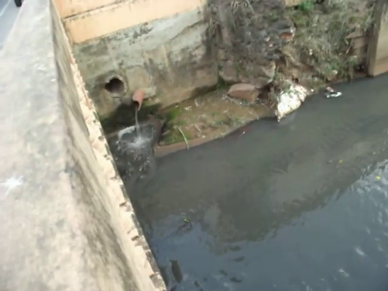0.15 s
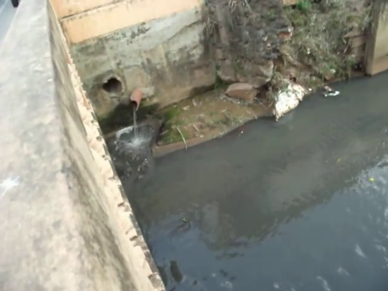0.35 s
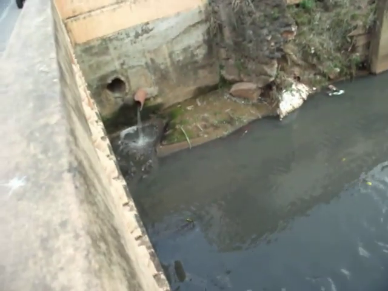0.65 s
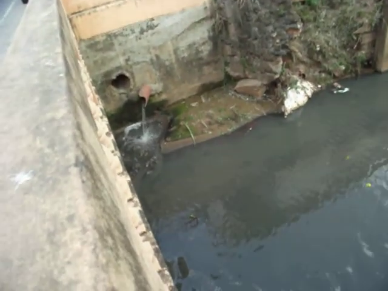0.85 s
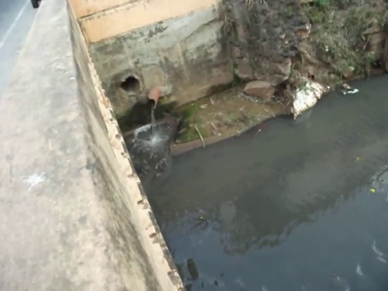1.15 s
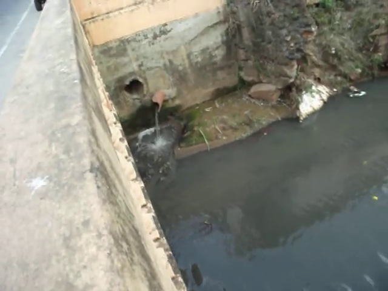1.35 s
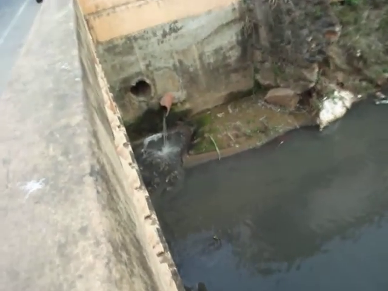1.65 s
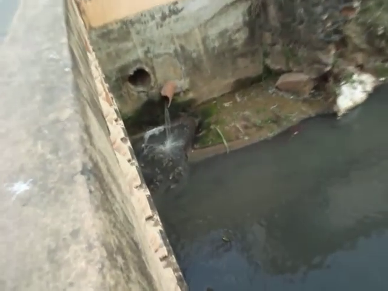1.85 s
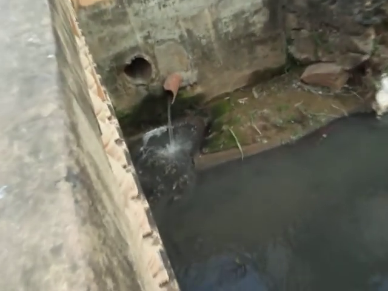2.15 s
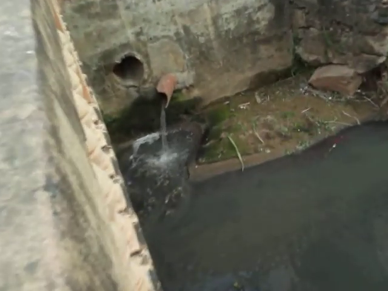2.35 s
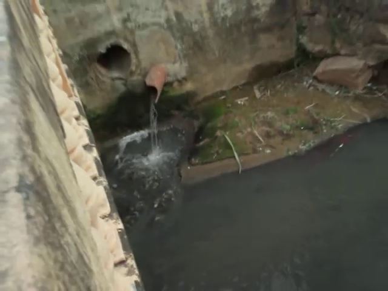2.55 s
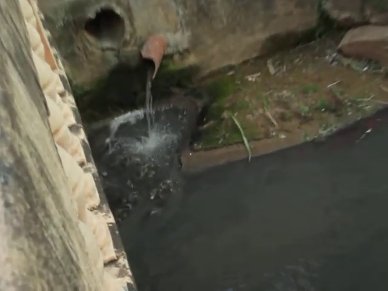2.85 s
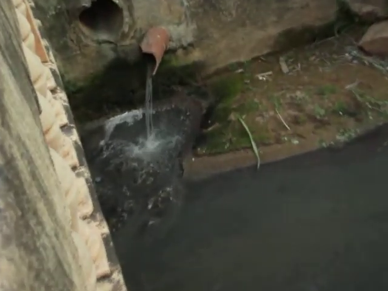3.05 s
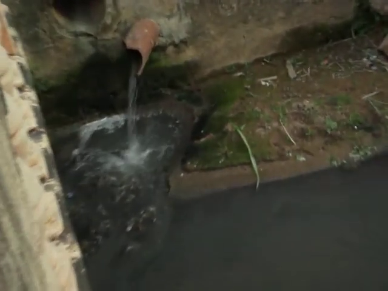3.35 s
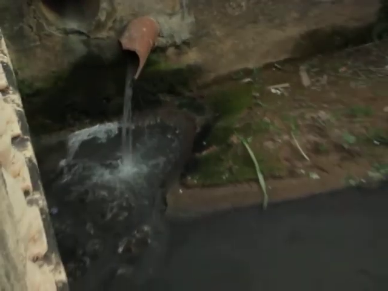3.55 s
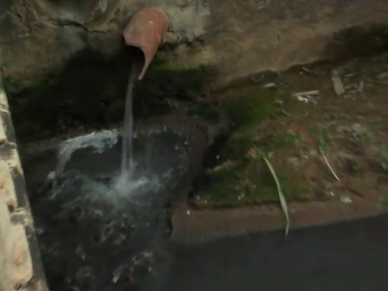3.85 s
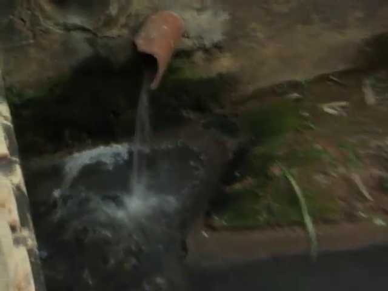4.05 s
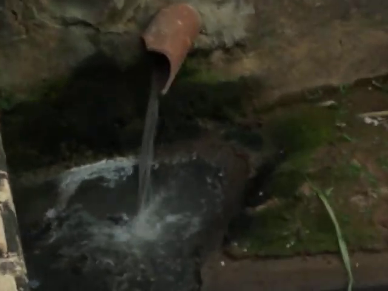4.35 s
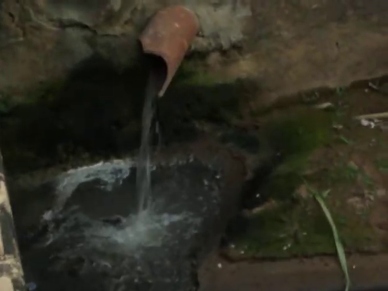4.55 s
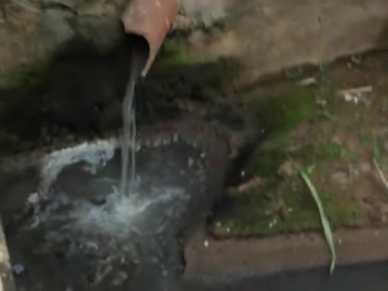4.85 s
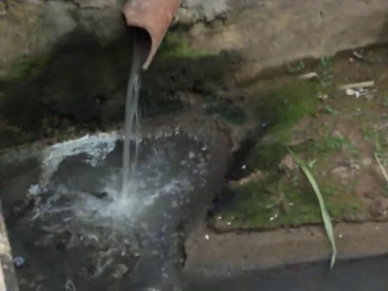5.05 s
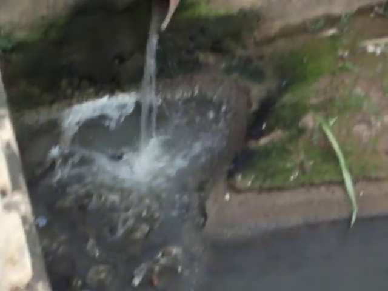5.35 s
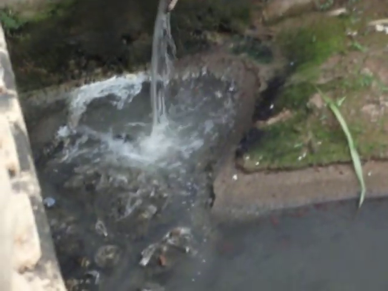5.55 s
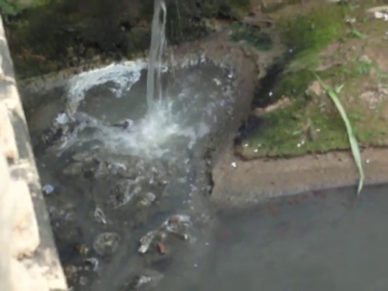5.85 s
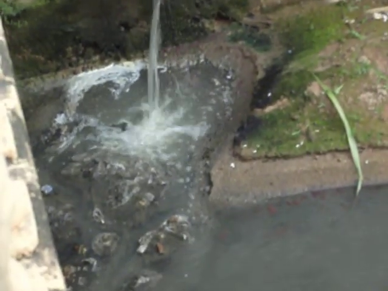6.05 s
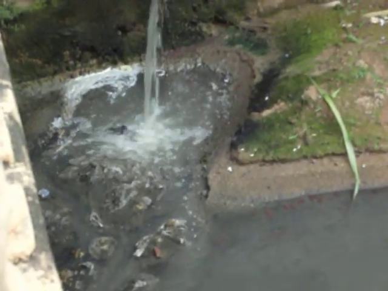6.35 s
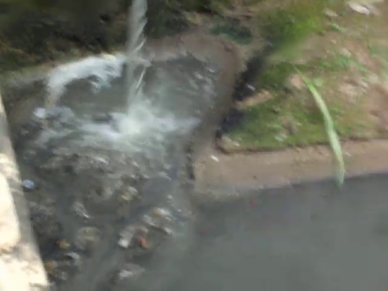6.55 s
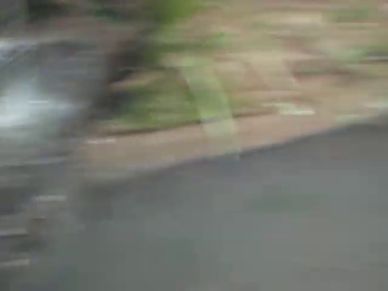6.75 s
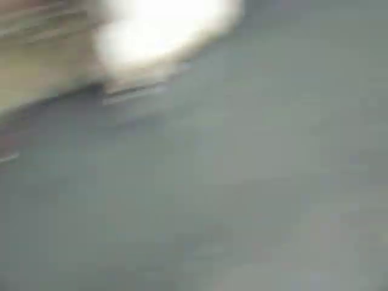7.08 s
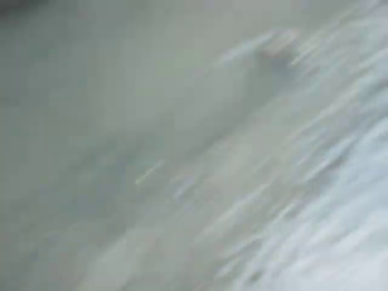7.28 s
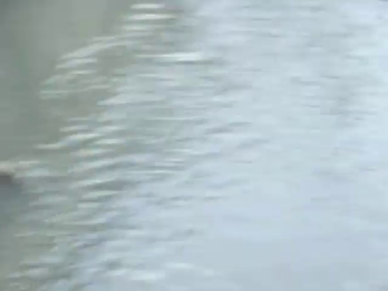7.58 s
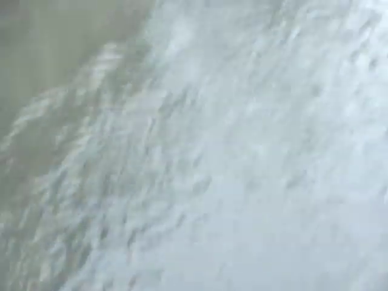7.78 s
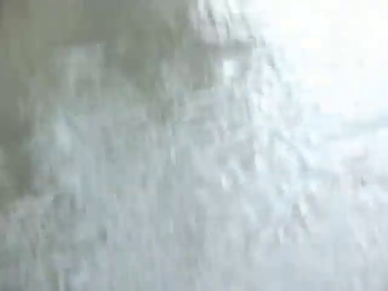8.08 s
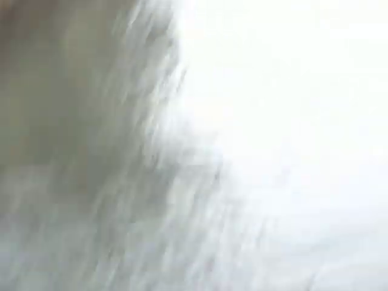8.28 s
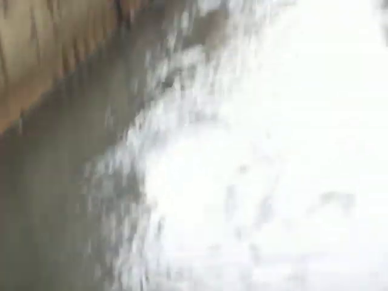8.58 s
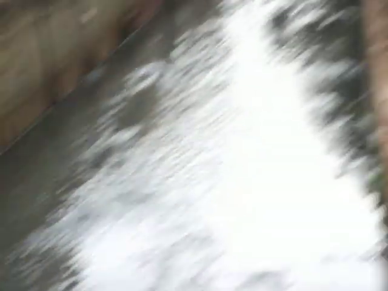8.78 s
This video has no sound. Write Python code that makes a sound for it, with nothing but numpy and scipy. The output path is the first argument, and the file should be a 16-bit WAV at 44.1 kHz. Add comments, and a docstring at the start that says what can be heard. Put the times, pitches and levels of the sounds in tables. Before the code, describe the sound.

A thin stream falls from a drain pipe into a shallow pool throughout: steady hissing spray, dense little ringing bubbles, light drop slaps and occasional rising plips, over low road rumble and broad traffic roar. A sharp housing tick snaps at 0.8 s, and tyres hiss past around 1 s as the water briefly swells. From 1.5 s a close zoom motor whirrs at a midrange pitch, slowly louder, stopping abruptly at 4.3 s. Meanwhile a low engine throbs nearby, climbing until 2.5 s then slowing, with another droning past. A loud double tick lands at 4.1 s. Traffic thins afterwards, with faint engines gliding by. A heavy slap falls at 7 s, the water gets louder from about 7.4 s, plips cluster near 8 s, strong slaps hit at 8.4 s and a final tick at 8.7 s. The small outdoor microphone rings near 3 kHz, with dull treble.

```python
"""A thin stream falls from a drain pipe into a shallow pool by a river channel, heard from the bank above.
From the start, spray noise, ringing bubbles, slapping drops and plips mingle with filtered-noise road rumble.
A tick at 0.8 s and hissing tyres near 1 s come first; a zoom motor of resonant noise whirrs from 1.5 to 4.3 s
as a near engine, a sum of harmonics, climbs and slows. Two ticks come at 4.1 s; late on, the water is louder,
with heavy slaps and a last tick at 8.7 s. The camera's microphone rings near 3 kHz and has little treble."""
import sys
import numpy as np
from scipy import signal
from scipy.fft import rfft, irfft, next_fast_len
from scipy.io import wavfile

SR = 44100
rng = np.random.default_rng(int(sys.argv[2]) if len(sys.argv) > 2 else 0)


def transcribe(signal):
    """Save signal, clipped to [-1, 1], as a 16-bit WAV file at the path in sys.argv[1]."""
    frames = np.atleast_2d(signal).T
    limited = np.clip(frames, -1, 1)
    pcm = np.round(limited * 32767).astype(np.int16)
    wavfile.write(sys.argv[1], SR, pcm)


N = 393314
TIME = np.arange(N) / SR


def from_db(db):
    """Decibels to amplitude gain."""
    return 10 ** (np.asarray(db) / 20)


def rms_one(x):
    """Scale to rms 1."""
    return x / np.sqrt(np.mean(x ** 2) + 1e-20)


def level_curve(rows):
    """Level in dB at every sample, joined by straight lines between (time [s], level [dB]) points."""
    times, levels = np.transpose(rows)
    return np.interp(TIME, times, levels)


def during(rows):
    """1 over the span of a curve, with 0.2 s fades outside it."""
    start, end = rows[0][0], rows[-1][0]
    return np.interp(TIME, [start - .2, start, end, end + .2], [0, 1, 1, 0])


def coloured(x, spectrum):
    """Filter by a (frequency [Hz], gain [dB]) curve, with minimum phase so that nothing sounds early."""
    hz, db = np.transpose(spectrum)
    size = 2 * next_fast_len(N // 2 + 4096)
    bins = np.maximum(np.fft.rfftfreq(size, 1 / SR), 1)
    gain = from_db(np.interp(np.log(bins), np.log(hz), db))
    # folding the cepstrum onto positive time gives the minimum phase
    cepstrum = irfft(np.log(gain), size)[:size // 2]
    response = np.exp(2 * rfft(cepstrum, size) - cepstrum[0])
    return irfft(rfft(x, size) * response, size)[:N]


def drift(rate):
    """Slow random curve of rms 1, changing about rate times a second."""
    step = 40  # samples between the slow points
    r = np.exp(-2 * step * np.pi * rate / SR)
    noise = rng.standard_normal(N // step + 2002)
    slow = signal.lfilter([1], [1, -2 * r, r * r], noise)[2000:]  # drop the settling time
    return np.interp(np.arange(N) / step, np.arange(len(slow)), rms_one(slow))


def ring(clicks, hz, t60):
    """A unit click sets a sine of height 1 ringing; it falls 60 dB in t60 seconds."""
    r = from_db(-60 / (t60 * SR))
    w = 2 * np.pi * hz / SR
    return signal.lfilter([0, np.sin(w)], [1, -2 * r * np.cos(w), r * r], clicks + 1e-18)


def resonant_noise(modes):
    """Noise through a few (frequency [Hz], width [Hz], level [dB]) resonances; rms 1."""
    out = np.zeros(N)
    for hz, width, db in modes:
        r = np.exp(-np.pi * width / SR)
        poles = [1, -2 * r * np.cos(2 * np.pi * hz / SR), r * r]
        mode = signal.lfilter([1, 0, -1], poles, rng.standard_normal(N))
        out += from_db(db) * (1 - r * r) * mode
    return rms_one(out)


def add(track, s, sound):
    """Mix a short sound in at time s."""
    at = int(s * SR)
    track[at:at + len(sound)] += sound[:N - at]


def bubbles(per_s, low_hz, high_hz, cycles, size_spread_db, count):
    """Bubbles of random size are born at random and fall 60 dB in a set number of cycles; rms 1."""
    sizes = from_db(size_spread_db * np.minimum(rng.exponential(1, N), 4))
    signs = rng.choice([-1, 1], N)
    births = sizes * signs * (rng.random(N) < per_s / SR)
    dealt = rng.integers(0, count, N)  # which pitch each bubble gets
    out = np.zeros(N)
    for k, hz in enumerate(np.linspace(low_hz, high_hz, count)):
        out += ring(births * (dealt == k), hz, cycles / hz) * np.sqrt(hz)
    return rms_one(out)


TREBLE_EDGE_HZ = 5750  # shared by the water's wash and the microphone

# Falling water at the pool as the microphone turns, before level_db: (time [s], level [dB])
WATER_LEVEL = [(0.05, -24), (1.01, -20), (1.65, -25.5), (2.46, -24), (3.38, -26), (4.39, -27.5),
               (6.56, -27), (7.4, -21), (8.09, -22), (8.9, -21.5)]
# Tone of the falling water, a relative filter: (frequency [Hz], gain [dB])
WATER_COLOUR = [(250, -16), (650, -7), (1100, -2.5), (1450, -3), (2300, 0), (3500, 5), (6500, -2)]
# Hollow resonances of the walled corner round the pool: (frequency [Hz], width [Hz], relative level [dB])
HOLLOW_MODES = [(583, 25, -1.5), (684, 33, 0), (1074, 37, -4.5)]


def splash(level_db=0.46, hollow_db=-44, spray_db=-5, fizz_db=-5, gurgle_db=-11, wash_db=-6,
           surge_db=1.5, surge_rate=16):
    """The jet breaks into lumps: each throws spray and drives bubbles under, over a wash off the walls."""
    spray = bubbles(per_s=3000, low_hz=900, high_hz=6300, cycles=3.0, size_spread_db=2.5, count=14)
    fizz = bubbles(per_s=2200, low_hz=1554, high_hz=5600, cycles=16, size_spread_db=3.0, count=36)
    gurgle = bubbles(per_s=700, low_hz=574, high_hz=2214, cycles=20, size_spread_db=2.5, count=28)
    lowpass = signal.butter(4, TREBLE_EDGE_HZ, fs=SR, output="sos")
    wash = rms_one(signal.sosfilt(lowpass, rng.standard_normal(N)))
    lumps = from_db(surge_db * drift(surge_rate))
    impact = from_db(spray_db) * spray + from_db(fizz_db) * fizz + from_db(gurgle_db) * gurgle
    water = rms_one(coloured(lumps * impact + from_db(wash_db) * wash, WATER_COLOUR))
    hollow = from_db(hollow_db) * resonant_noise(HOLLOW_MODES)
    return from_db(level_curve(WATER_LEVEL) + level_db) * water + hollow


SMALL_SLAPS_PER_S, SMALL_SLAP_DB = 2.3, -18  # lighter drops fall at random; level before slap_db
# Heaviest drops slapping the pool, before slap_db: (time [s], level [dB])
HEAVY_SLAPS = [(2.6568, -9), (7.0125, -7.5), (7.568, -13.5), (8.4194, -7), (8.4229, -6), (8.577, -16.5)]
# Single large bubbles in the pool, before plip_db: (time [s], level [dB], starting pitch [Hz])
PLIPS = [(0.7547, -16, 2050), (1.0301, -8, 1800), (7.7104, -9.5, 1940), (7.877, -12.5, 2070),
         (7.9169, -10, 2000), (8.0631, -11.5, 1945), (8.7994, -11, 2090)]


def drops(slap_db=-3, slap_hz=3000, slap_s=0.0004, plip_db=-4, rise_per_s=1.6):
    """A drop slaps the surface; a large bubble fades over some twelve cycles, rising in pitch as it comes up."""
    out = np.zeros(N)
    t = TIME[:SR // 16]
    impact = t / slap_s * np.exp(1 - t / slap_s)  # swells as the drop sinks in, then dies
    falls = rng.random(N) < SMALL_SLAPS_PER_S / SR
    lighter = [(s, SMALL_SLAP_DB) for s in TIME[falls]]
    for s, db in [*HEAVY_SLAPS, *lighter]:
        hz = slap_hz * rng.normal(1, .05)
        add(out, s, from_db(db + slap_db) * impact * np.sin(2 * np.pi * hz * t))
    for s, db, hz in PLIPS:
        fade = np.exp(-t * hz / 12)
        tone = np.sin(2 * np.pi * hz * t * (1 + rise_per_s * t / 2))
        add(out, s, from_db(db + plip_db) * fade * tone)
    return out


# The zoom motor, right at the microphone, starts, grows slowly louder and stops dead
ZOOM_START_S, ZOOM_ATTACK_S, ZOOM_STOP_S, ZOOM_RELEASE_S = 1.5, 0.26, 4.31, 0.034
ZOOM_END_DB, ZOOM_RISE_DB_PER_S = -28.5, 3.5  # level on reaching the stop time
# Zoom gears in the housing: (frequency [Hz], width [Hz], relative level [dB])
ZOOM_MODES = [(1320, 74, -8), (1613, 60, -3.5), (1887, 35, -0.5), (1880, 100, -5.5)]
# Ticks of the housing: (time [s], ring level [dB], ring pitch [Hz], ring t60 [s], crack gain [dB])
HOUSING_TICKS = [(0.797, -6, 1910, 0.024, -1.5), (4.1265, -12.5, 1970, 0.024, -13),
                 (4.1321, 2.5, 1930, 0.036, -3.5), (8.7258, 0, 1747, 0.02, -9)]
# Brief crack that starts a tick: (frequency [Hz], level before crack gain [dB], t60 [s])
CRACK_MODES = [(2940, -0.5, 0.0078), (4300, 3, 0.012), (5240, -5, 0.0023)]


def camera():
    """The zoom gears whirr in the housing, which also ticks sharply under the hand."""
    start = np.clip((TIME - ZOOM_START_S) / ZOOM_ATTACK_S, 0, 1)
    stop = np.clip(1 - (TIME - ZOOM_STOP_S) / ZOOM_RELEASE_S, 0, 1)
    zoom_db = ZOOM_END_DB + ZOOM_RISE_DB_PER_S * (TIME - ZOOM_STOP_S)
    whirr = from_db(zoom_db) * start * stop * resonant_noise(ZOOM_MODES)
    ticks = np.zeros(N)
    blow = signal.unit_impulse(SR // 16)
    crack = sum(from_db(db) * ring(blow, hz, t60) for hz, db, t60 in CRACK_MODES)
    for s, ring_db, hz, t60, crack_db in HOUSING_TICKS:
        add(ticks, s, from_db(ring_db) * ring(blow, hz, t60) + from_db(crack_db) * crack)
    return whirr + ticks


def passing(at_s, swell_s):
    """Gain of a vehicle driving past: 1 at its nearest, dying away as the banks hide it."""
    return (1 + ((TIME - at_s) / swell_s) ** 2 / 2) ** -2


def engine(hz, orders, wobble, flutter_db):
    """A distant engine: only its low orders carry, each fluttering in the air."""
    phase = 2 * np.pi * np.cumsum(hz * (1 + wobble * drift(8.6))) / SR
    out = np.zeros(N)
    for multiple, order_db in orders:
        gain = from_db(order_db + flutter_db * drift(5))
        out += gain * np.sin(multiple * phase + 2 * np.pi * rng.random())
    return np.sqrt(2) * out


# The near engine's firing rate climbs to a top, then sinks
NEAR_TOP_S, NEAR_TOP_HZ, NEAR_CLIMB_HZ_PER_S, NEAR_SAG_HZ_PER_S = 2.48, 66.7, 5, 12.2
# The drone's turning rate is highest when it is nearest and sags on either side
DRONE_HZ, DRONE_SAG_HZ_PER_S, DRONE_AT_S, DRONE_SWELL_S, DRONE_DB = 31.47, .9, 2.3, 1.51, -35
# Throbbing of the nearest engine, before near_db: (time [s], level [dB])
NEAR_ENGINE_LEVEL = [(1.4, -26), (1.51, -21), (2.24, -23), (2.31, -14), (2.41, -25), (2.53, -12.5),
                     (2.72, -25.5), (2.86, -16), (3.05, -21), (3.26, -18.5), (3.3, -27), (3.64, -20.5),
                     (4.3, -32)]
# Harmonics of the near and far engines: (multiple of the firing rate, relative level [dB])
ENGINE_ORDERS = [(1, 0.5), (2, -14), (3, -24.5)]
# Harmonics of the droning engine: (multiple of its turning rate, relative level [dB])
DRONE_ORDERS = [(3, 7.5), (4, 2), (5, 1.5), (6, 0.5), (7, -5.5), (8, -5.5), (12, -1.5), (15, -8)]
# Farther engines: (time nearest [s], level [dB], swell [s], firing rate when nearest [Hz], change [Hz/s])
FAR_ENGINES = [(0.05, -29.5, .25, 181, -1), (1.05, -26.5, .6, 81.86, -20.5), (4.1, -30, .45, 92.5, -3.5),
               (4.6, -29.5, .3, 110.3, 7.5), (5.95, -28.5, .35, 72, -2), (7.3, -29.5, .7, 77, 10),
               (8.6, -33.5, .5, 52.8, -1.5)]


def engines(near_db=-1):
    """One engine climbs and slows close by, one drones past, and farther ones glide in pitch as they go by."""
    since_top = TIME - NEAR_TOP_S
    near_hz = NEAR_TOP_HZ + np.minimum(NEAR_CLIMB_HZ_PER_S * since_top, -NEAR_SAG_HZ_PER_S * since_top)
    near_gain = from_db(level_curve(NEAR_ENGINE_LEVEL) + near_db) * during(NEAR_ENGINE_LEVEL)
    out = near_gain * engine(near_hz, ENGINE_ORDERS, wobble=.005, flutter_db=-0.1)
    drone_hz = DRONE_HZ - DRONE_SAG_HZ_PER_S * np.abs(TIME - DRONE_AT_S)
    drone_gain = from_db(DRONE_DB) * passing(DRONE_AT_S, DRONE_SWELL_S)
    out += drone_gain * engine(drone_hz, DRONE_ORDERS, wobble=.007, flutter_db=3.0)
    for s, db, swell_s, hz, hz_per_s in FAR_ENGINES:
        glide = hz_per_s * np.clip(TIME - s, -2 * swell_s, 2 * swell_s)
        far = engine(hz + glide, ENGINE_ORDERS, wobble=0.0072, flutter_db=1.0)
        out += from_db(db) * passing(s, swell_s) * far
    return out


TYRES_AT_S, TYRES_SWELL_S, TYRES_DB = 0.98, 0.71, -24.5  # tyres hissing past
# Low rumble of the road, before rumble_db: (time [s], level [dB])
RUMBLE_LEVEL = [(0.2, -27), (0.85, -24), (0.96, -25.5), (1.23, -26.5), (3.07, -27.5), (4.73, -30),
                (5.21, -33.5), (8.8, -31)]
# Tone of the rumble, a relative filter: (frequency [Hz], gain [dB])
RUMBLE_COLOUR = [(12, -9.5), (25, -5), (40, 1), (70, -1), (120, -1), (160, -14), (250, -26.5), (500, -41)]
# Broad roar of the road, before roar_db: (time [s], level [dB])
ROAR_LEVEL = [(0.27, -28), (2.14, -28), (4.52, -34), (7.91, -35.5), (8.9, -33.5)]
# Tone of the roar, a relative filter: (frequency [Hz], gain [dB])
ROAR_COLOUR = [(90, -10.5), (180, 1), (270, 0), (400, -1.5), (600, -5.5), (1000, -5.5), (1500, -7),
               (2300, -15), (5000, -26.5)]
# Resonances in the tyre hiss: (frequency [Hz], width [Hz], relative level [dB])
TYRE_MODES = [(1081, 92, -3), (1330, 110, -5.5), (2429, 55, 3), (2920, 220, -7)]


def road(rumble_db=3.0, roar_db=2):
    """A low rumble and a broad roar of traffic are filtered noise; the nearest tyres hiss in resonances."""
    rumble = rms_one(coloured(rng.standard_normal(N), RUMBLE_COLOUR))
    roar = rms_one(coloured(rng.standard_normal(N), ROAR_COLOUR))
    tyres = from_db(TYRES_DB) * passing(TYRES_AT_S, TYRES_SWELL_S) * resonant_noise(TYRE_MODES)
    rumble_gain = from_db(level_curve(RUMBLE_LEVEL) + rumble_db)
    roar_gain = from_db(level_curve(ROAR_LEVEL) + roar_db)
    return rumble_gain * rumble + roar_gain * roar + tyres


def scene():
    """Water, road and camera at one microphone."""
    return (splash() + drops() + camera() + engines() + road())[None]


def limited(x, threshold_db=-2.5, attack_s=0.0013, release_db_per_s=250):
    """The gain ducks just after a peak and recovers quickly."""
    over = np.maximum(20 * np.log10(np.abs(x) + 1e-9) - threshold_db, 0)
    release = release_db_per_s * TIME
    held = np.maximum.accumulate(over + release) - release
    r = np.exp(-1 / (attack_s * SR))
    return x * from_db(-signal.lfilter([1 - r], [1, -r], held))


KNEE, OVERLOAD = .66, .715  # amplitudes where squashing begins and where it ends


def rounded(x):
    """Peaks above the knee are squashed against the overload level."""
    kept = np.clip(x, -KNEE, KNEE)
    room = OVERLOAD - KNEE
    return kept + room * np.tanh((x - kept) / room)


CUTOFF_HZ = 16000  # last lowpass, after the overload
# Microphone response: (frequency [Hz], gain [dB])
MICROPHONE = [(1000, 0), (2200, 1), (2600, 4), (2950, 8.5), (3300, -0.5), (3650, -7.5), (4000, -12),
              (4700, -19.5), (5500, -27)]


def record(dry):
    """The microphone colours the sound and loses treble; the sharpest ticks outrun the limiter and overload."""
    heard = coloured(dry[0], MICROPHONE)
    treble_loss = signal.cheby1(12, .2, TREBLE_EDGE_HZ, fs=SR, output="sos")
    heard = signal.sosfilt(treble_loss, heard)
    squashed = rounded(limited(heard))
    cutoff = signal.cheby2(12, 70, CUTOFF_HZ, fs=SR, output="sos")
    return signal.sosfilt(cutoff, squashed)[None]


dry = scene()
out = record(dry)
transcribe(out)
```